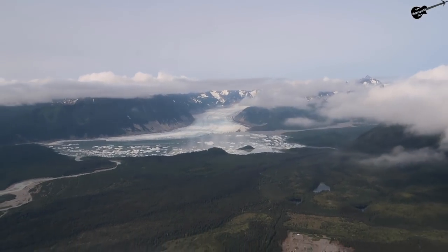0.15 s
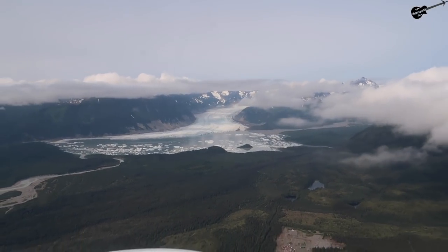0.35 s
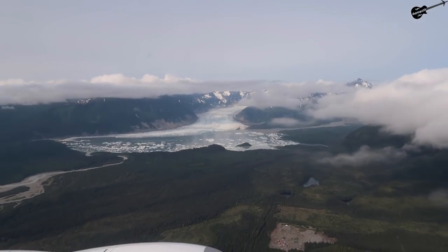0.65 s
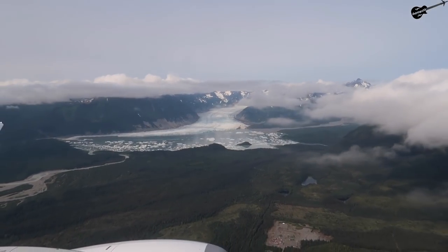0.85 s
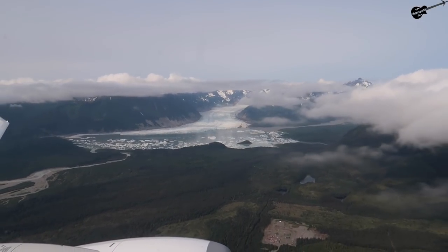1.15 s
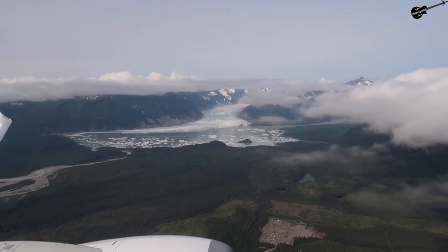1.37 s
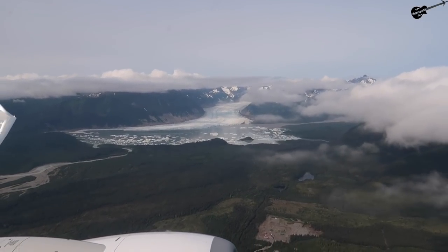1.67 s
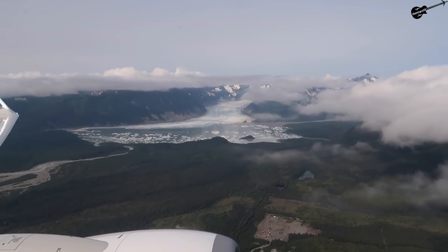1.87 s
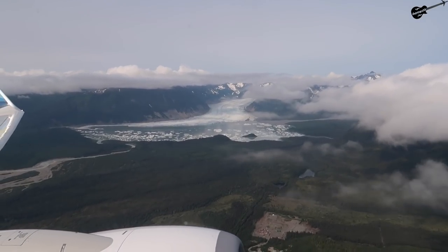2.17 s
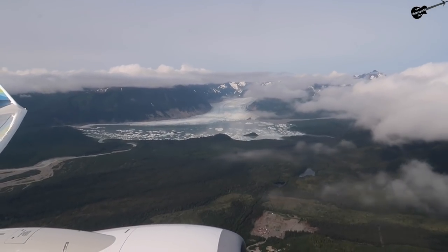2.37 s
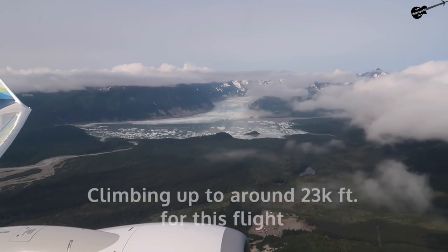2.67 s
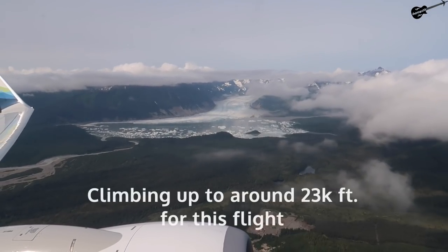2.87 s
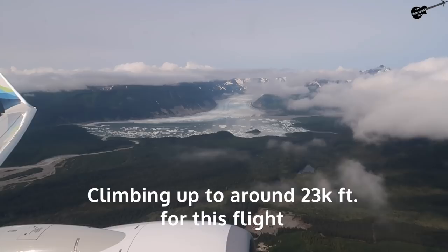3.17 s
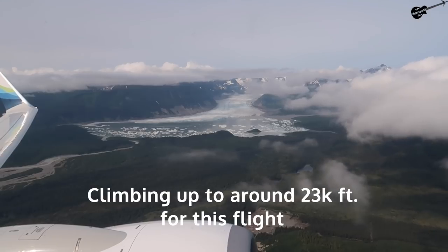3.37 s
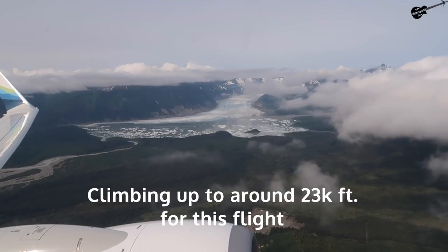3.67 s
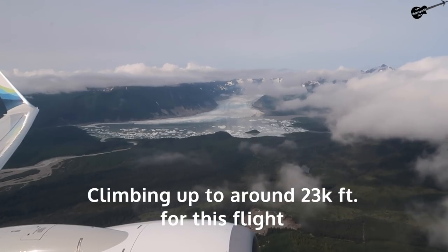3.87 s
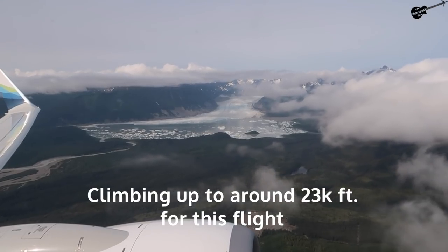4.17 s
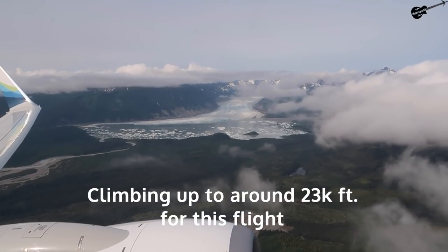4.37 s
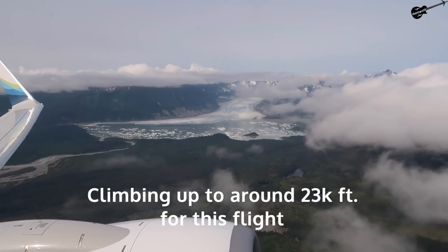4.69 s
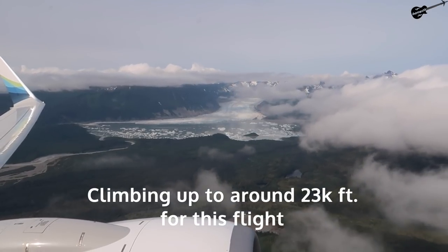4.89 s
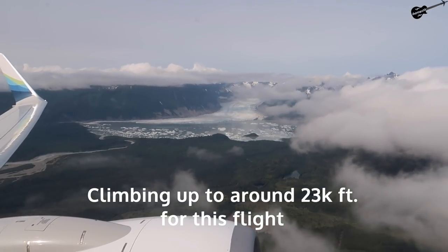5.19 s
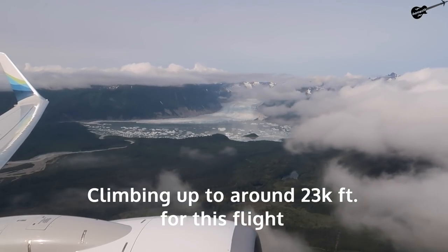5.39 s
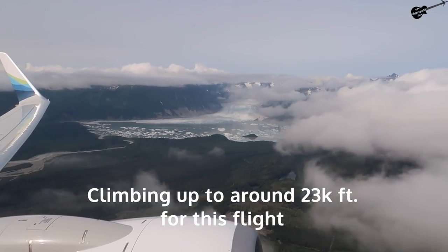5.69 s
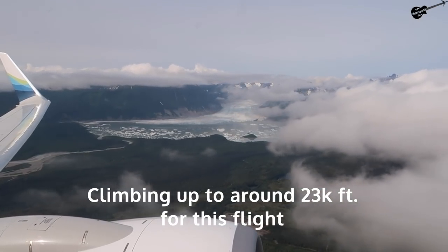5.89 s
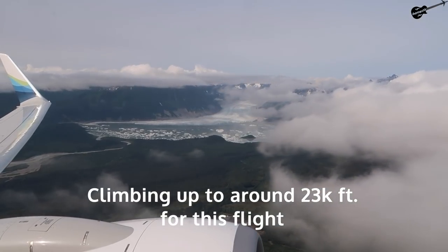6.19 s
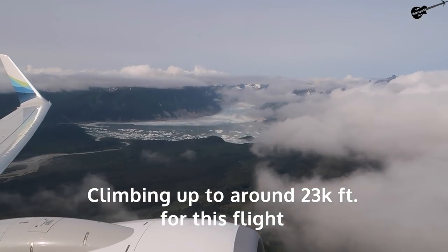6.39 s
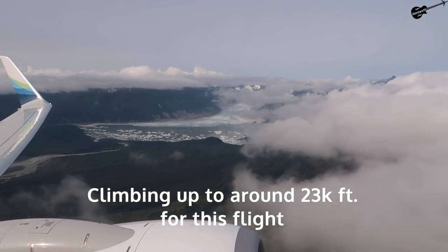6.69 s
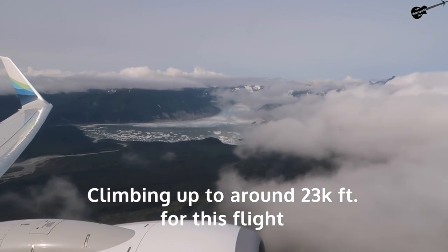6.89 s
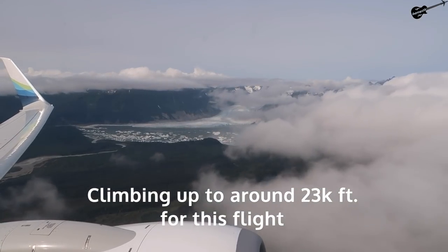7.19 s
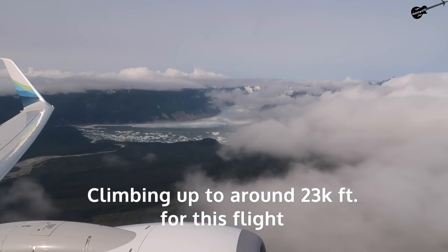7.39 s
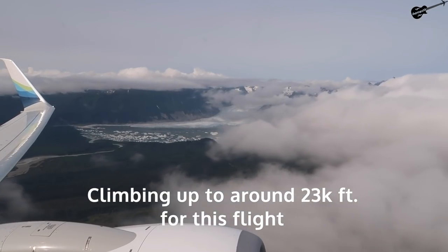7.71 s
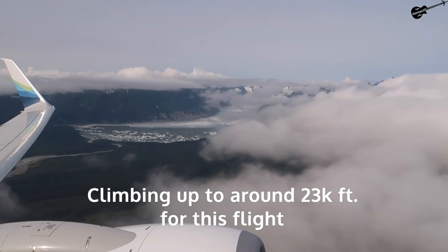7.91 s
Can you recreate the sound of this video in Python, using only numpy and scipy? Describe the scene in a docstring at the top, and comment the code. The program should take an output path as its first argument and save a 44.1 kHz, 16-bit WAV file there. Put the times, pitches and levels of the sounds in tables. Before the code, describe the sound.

Passenger-seat cabin sound over the wing: deep engine hum, buzz-saw rasp and wavering thin whines blend with a constant dull air roar.

```python
"""Jet climb from a wing seat

Two jet engines at climb power, heard through the cabin wall. Supersonic fan tips make a buzz-saw tone on
every multiple of the shaft speed; the fans turn at slightly different speeds, so their blade tones beat.
A once-per-turn hum, a core shaft tone and three thin whines are sines with wavering levels.
Jet roar, the rush of air along the skin and hiss are filtered noise that fills in below."""
import sys
import numpy as np
from scipy import signal
from scipy.fft import rfft, irfft, next_fast_len
from scipy.io import wavfile
from scipy.ndimage import uniform_filter1d, minimum_filter1d

SR = 44100
rng = np.random.default_rng(int(sys.argv[2]) if len(sys.argv) > 2 else 0)


def bounce(signal):
    """Save signal as a 16-bit WAV file at the path given by the first command-line argument."""
    frames = np.transpose(np.atleast_2d(signal))
    limited = np.clip(frames, -1, 1)
    pcm = np.round(limited * 32767).astype(np.int16)
    wavfile.write(sys.argv[1], SR, pcm)


N = 355005
TIME_S = np.arange(N) / SR


def from_db(db):
    """Decibels to gain."""
    return 10 ** (np.asarray(db) / 20)


def in_time(rows):
    """Curve columns, interpolated at every sample."""
    s, *columns = np.transpose(rows)
    return [np.interp(TIME_S, s, column) for column in columns]


def at_hz(points, hz):
    """Read a level curve on a log-frequency (or log-multiple) axis."""
    point_hz, point_db = np.array(points).T
    return np.interp(np.log(hz), np.log(point_hz), point_db)


def drift(rate_hz):
    """Slow chance: noise at every 100th sample through a double one-pole low-pass; spread 1."""
    pole = np.exp(-200 * np.pi * rate_hz / SR)
    noise = rng.standard_normal(N // 100 + 2002)
    slow = signal.lfilter([1], [1, -2 * pole, pole * pole], noise)[2000:]   # drop the filter's start-up
    return np.interp(np.arange(N) / 100, np.arange(len(slow)), slow / slow.std())


# mean speed of the two fan shafts, creeping up: (time [s], speed [turns/s])
SHAFT_SPEED = [(0, 77.742), (2.25, 77.795), (5.25, 77.94), (8.05, 78.012)]
# moments at which the fans' blade tones cancel, the far fan having gained one more blade: time [s]
BLADE_NULLS = [0.247, 0.643, 1.336, 2.066, 2.516, 2.891, 3.234, 3.695, 4.088, 4.451, 5.134, 5.615, 5.96,
               6.527, 7.0, 7.415, 7.762]
BLADES = 24


def fan_angles():
    """Shaft angles [turns] of the far and near fan: each null puts the far fan one more blade ahead."""
    mean = np.cumsum(in_time(SHAFT_SPEED)[0]) / SR
    nulls = np.r_[BLADE_NULLS[0] - .45, BLADE_NULLS, BLADE_NULLS[-1] + .4]
    # tones cancel half a blade apart, hence the .5
    blades_ahead = np.interp(TIME_S, nulls, np.arange(len(nulls)) - .5)
    blades_ahead = uniform_filter1d(blades_ahead, size=SR // 8)
    half_lead = blades_ahead / BLADES / 2
    return mean + half_lead, mean - half_lead


# buzz-saw tones that stand out, levels at mid-scene before swell and waver: (multiple of shaft speed,
# far fan level [dB], its growth [dB/s], near fan level [dB], its growth [dB/s])
BUZZ_TONES = [(2, -42, 0, -34, 0), (3, -44, 0, -30.5, 0), (4, -40, 0, -50, 0), (5, -66, 0, -35, 0),
              (6, -60, 0, -45, 0), (8, -69, 0, -46, .2), (11, -62, 0, -50.5, .9), (13, -58, 0, -62, 0),
              (14, -57.5, .3, -68, 0), (15, -60, 0, -64, 0), (16, -69, 0, -59.5, .8), (17, -64, 1, -64, 1),
              (18, -60, 0, -58, .3), (19, -68, 0, -65, -.6), (20, -74, 1, -70, .8), (21, -63, .4, -64, 1.5),
              (22, -66, 1.2, -67, .4), (24, -49.3, 0, -49.3, -.1), (25, -62, 0, -57.5, .9),
              (26, -68, -.3, -65, 0), (27, -59.5, 0, -67, 1), (28, -72, 1, -71, -1), (29, -61, 0, -66, 1.4),
              (30, -86, 0, -63, 0), (31, -73, .8, -69, -.3), (32, -68, 0, -70, -1),
              (33, -65, -1, -61.5, -.2), (34, -84, 0, -75, .9), (35, -79, .4, -75, .7),
              (36, -68, 0, -80, 1), (37, -80, 0, -67.5, -.6), (38, -74, -.6, -61.5, -.4),
              (39, -83, 0, -69.5, .3), (40, -74, .4, -76, -.4), (41, -72, .7, -70, -.9),
              (42, -77, 0, -73.5, -2.5), (43, -77, 0, -77, -.6), (44, -79, 0, -80, 0),
              (45, -84, 1, -71, .2), (46, -76, .5, -71.5, .9), (47, -78, 0, -71.5, .3),
              (48, -61, -.3, -70, .8), (49, -79, .5, -75, .8), (50, -74, -1.2, -86, 0),
              (51, -73.5, .6, -73.5, .5), (52, -84, 0, -72.5, 1), (53, -86, 1.5, -84, 1.8),
              (55, -83, .8, -86, .8), (56, -83, 0, -86, 0), (57, -76, .3, -84, .3), (58, -86, 0, -77.5, 0),
              (59, -90, .8, -88, .8), (62, -88, 0, -86, 0), (63, -89, 0, -84, 0), (64, -87, .6, -91, .6),
              (65, -86, 1.5, -86, 1.5), (70, -92, 0, -83, 0), (71, -83.5, -.4, -93, 0),
              (72, -87, .3, -89, .3), (74, -90, 0, -94, 0), (81, -93, 1.5, -86, 2), (83, -92, 0, -89, .5),
              (86, -92, 0, -89, .5), (116, -97, -.3, -99, -.3)]
# centre of the scattered levels of all other tones, blade unevenness being chance: (multiple, level [dB])
OTHER_BUZZ = [(7, -57), (13, -61), (23, -71), (35, -77), (44, -80), (53, -85), (60, -92), (72, -95),
              (85, -97), (124, -104)]
# tones in the side pick-up against the front one, before scatter: (multiple, level [dB])
SIDE_BUZZ = [(2, -53.5), (5, -44.5), (8, -36), (11, -22.5), (16, -22.5), (23, -18), (24, -14), (25, -14),
             (32, -12), (41, -17.5), (48, -25), (54, -4), (62, 0.5), (124, -3)]
# far-fan tones that sink mid-way and return: (multiple, level change [dB])
FAR_DIPS = [(29, -12), (48, -12)]
# a moment at which the two fans cancel on a tone that beats clearly: (multiple, time [s])
CLEAR_NULLS = [(21, 4.29), (25, 4.85), (27, 5.16), (29, 6.66), (33, 3.66), (38, 1.89), (48, 5.8),
               (51, 6.36)]
# the far fan's other tones run a little ahead of its blade tone at first: (time [s], lead [turns])
FAR_TONE_LEAD = [(0, .009), (2, .006), (4, 0), (8.05, 0)]
TOP_MULTIPLE = 124
REST_SCATTER_DB, SIDE_SCATTER_DB = 4, 2.5
SIDE_LAG_RAD, SIDE_LAG_SCATTER_RAD = 1.9, 1.1
BLADE_WAVER_DB, BLADE_FLUTTER_DB, FLUTTER_DB = .5, .5, 1.8


def buzz_saw(angle, lead, listed_db, growth_db_per_s, sags, null_turn, waver_db):
    """One fan: a shock pattern that repeats each turn; interleaved groups of tones waver on their own."""
    multiple = np.arange(2, TOP_MULTIPLE + 1)
    scatter = rng.standard_normal((2, len(multiple)))
    level_db = at_hz(OTHER_BUZZ, multiple) + REST_SCATTER_DB * scatter[0]
    listed = np.array(BUZZ_TONES)[:, 0].astype(int) - 2   # index 0 is multiple 2
    level_db[listed] = listed_db
    growth_db = np.zeros(len(multiple))
    growth_db[listed] = growth_db_per_s * N / SR / 2   # over half the scene
    early, middle, late = from_db(-growth_db), np.ones(len(multiple)), from_db(growth_db)
    for sagging, sag_db in sags:
        middle[sagging - 2] = from_db(sag_db)

    size = from_db(level_db) * np.sqrt(2)   # rms to peak
    side_size = size * from_db(at_hz(SIDE_BUZZ, multiple) + SIDE_SCATTER_DB * scatter[1])
    phase = 2 * np.pi * rng.random((2, len(multiple)))
    blade = multiple % BLADES == 0
    phase[0, blade | (multiple == 3)] = 0   # these tones set the beats that stand out
    for beating, null_s in CLEAR_NULLS:
        turns_at_null = (angle + lead)[int(null_s * SR)]
        phase[0, beating - 2] = 2 * np.pi * (null_turn - beating * turns_at_null)
    lag_scatter = SIDE_LAG_SCATTER_RAD * rng.standard_normal(len(multiple))
    phase[1] = phase[0] - SIDE_LAG_RAD + lag_scatter

    steady = blade | (multiple == 3) | (multiple == 5)
    groups = np.where(multiple == BLADES, 8, np.where(steady, 7, multiple % 7))
    turn = np.linspace(0, 1, 8193)
    blend = 2 * np.arange(N) / N - 1   # -1 at the start, 0 mid-way, 1 at the end
    out = np.zeros(N, complex)   # real part: front, imaginary part: side
    for group in range(9):
        pick = groups == group
        cycles = 2 * np.pi * np.outer(turn, multiple[pick])
        front_shape = np.cos(cycles + phase[0, pick]) * size[pick]
        side_shape = np.cos(cycles + phase[1, pick]) * side_size[pick]
        shape = front_shape + 1j * side_shape
        group_angle = (angle + lead * (group < 8)) % 1   # the blade tone takes no lead
        first, mid, last = [np.interp(group_angle, turn, shape @ gain[pick])
                            for gain in (early, middle, late)]
        slow_db, fast_db = waver_db, FLUTTER_DB
        if steady[pick].all():
            slow_db, fast_db = BLADE_WAVER_DB, BLADE_FLUTTER_DB
        waver = slow_db * drift(.7) + fast_db * drift(7)   # turbulence makes each group flutter
        end = np.where(blend < 0, first, last)
        out += from_db(waver) * (mid + np.abs(blend) * (end - mid))
    return np.array([out.real, out.imag])


# once-per-turn hum of the near fan, before its waver: (time [s], level [dB])
HUM_LEVEL = [(0, -28), (.75, -26), (1.1, -22), (1.7, -22.5), (2.3, -18), (2.75, -21), (3.25, -21.5),
             (3.7, -20), (4.25, -19), (4.6, -21.5), (5.4, -22.5), (5.8, -20), (6.3, -21), (6.9, -22.5),
             (7.4, -20.5), (7.75, -23), (8.05, -30)]
HUM_WAVER_DB = .7


def fan_hum(near):
    """Once-per-turn hum of the near fan through the airframe: a sine locked to its shaft angle."""
    level_db = in_time(HUM_LEVEL)[0] + HUM_WAVER_DB * drift(1.5)
    hum = np.sqrt(2) * from_db(level_db) * np.sin(2 * np.pi * near)
    return hum * from_db([[0], [-80]])   # front, side


CORE_HZ, CORE_NULL_S = 232.24, 3.68   # pitch, and a moment of cancelling the near fan's third tone
CORE_DB, CORE_WAVER_DB = -28.5, 1.3


def core(near):
    """The core shaft tone lies just under the near fan's third tone and throbs against it."""
    third_tone_turns = 3 * near[int(CORE_NULL_S * SR)]
    turns = CORE_HZ * (TIME_S - CORE_NULL_S) + third_tone_turns + .5   # half a turn apart cancels
    level = from_db(CORE_DB + CORE_WAVER_DB * drift(1.2))
    return np.sqrt(2) * level * np.cos(2 * np.pi * turns) * from_db([[0], [-42]])   # front, side


# three close whines, two perhaps pumps and one near the fans' 19th multiple, that beat into short surges:
# (pitch [Hz], start of cycle [turns])
WHINE_PITCHES = [(1472.97, -.3), (1476.72, .5), (1479.86, 0)]
# their levels before flutter: (time [s], first level [dB], second level [dB], third level [dB])
WHINE_LEVELS = [(0, -49, -49, -57), (.3, -52, -56, -62), (.75, -53, -61, -62), (1.5, -53, -61, -63),
                (2.25, -51, -49, -56), (2.6, -55, -55, -65), (3.0, -54, -57, -62), (3.4, -50, -51, -56),
                (3.9, -50, -54, -62), (4.4, -49, -50.5, -52), (4.8, -54, -55, -62), (5.2, -50, -53, -60),
                (5.65, -47, -50, -66), (6.0, -50, -54, -58), (6.5, -50, -59, -58), (7.0, -48, -54, -49),
                (7.4, -49, -51, -58), (8.05, -52, -54, -66)]
WHINE_WANDER_HZ, WHINE_FLUTTER_DB = .02, 1.5


def whines():
    """Thin sine tones around fixed pitches, wandering a little and fluttering in level."""
    out = 0
    for (hz, start), level_db in zip(WHINE_PITCHES, in_time(WHINE_LEVELS)):
        pitch_hz = hz + WHINE_WANDER_HZ * drift(0.6)
        phase = 2 * np.pi * (start + np.cumsum(pitch_hz) / SR)
        level = from_db(level_db + WHINE_FLUTTER_DB * drift(9.3))
        out = out + np.sqrt(2) * level * np.sin(phase)
    return out * from_db([[0], [-22]])   # front, side


# swell of the air rush, before trim and patchiness: (time [s], level [dB])
AIR_RUSH = [(0, -31), (1, -31), (1.35, -34.5), (1.7, -31.5), (2.3, -32), (3, -30.5), (3.6, -31),
            (4.2, -28.5), (4.8, -32), (5.8, -29), (6.7, -31.5), (7.1, -28), (7.6, -32), (8.05, -32.5)]
# noise colour in the front-facing pick-up: (frequency [Hz], relative density [dB])
FRONT_COLOUR = [(20, -22.5), (30, -25), (45, -7), (62, -4), (130, 1.5), (165, -3.5), (225, -4.5),
                (370, -15.5), (750, -27), (1250, -36.5), (2050, -42.5), (2450, -48), (2800, -52.5),
                (3350, -52.5), (3650, -51.5), (3900, -54.5), (4500, -62.5), (5200, -66.5), (5600, -64),
                (6200, -70), (9500, -74.5), (10300, -80.5), (11600, -79.5), (11900, -105)]
# noise colour in the side-facing pick-up: (frequency [Hz], relative density [dB])
SIDE_COLOUR = [(20, -95), (60, -78), (100, -60), (150, -51), (180, -48), (230, -44), (280, -47), (370, -50),
               (520, -45.5), (700, -51), (800, -48.5), (900, -53), (1250, -60), (2050, -46.5), (3300, -68),
               (4100, -61.5), (8000, -70), (12300, -71), (13200, -83.5), (14300, -92)]
# narrow and broad cabin resonances that colour the noise: (centre [Hz], width [Hz], boost [dB])
CABIN_RESONANCES = [(154, 9.9, 3), (346, 74, 3), (621, 84, 4), (1038, 120, 5), (1490, 31, 4.5)]
ROAR_TOP_HZ, RUSH_TOP_HZ = 400, 2500
ROAR_FOLLOWS, HISS_FOLLOWS = 0.72, 0.96   # share of the rush's swing in dB
HISS_GROWTH_DB_PER_S = 0.05


def cabin_noise(patchy_db):
    """Front and side noise, split into roar, rush and hiss, each under its own level."""
    rush_db, = in_time(AIR_RUSH)
    swing_db = rush_db - rush_db.mean()
    # roar and hiss levels relative to the rush, which scales all three at the end
    roar_db = (ROAR_FOLLOWS - 1) * swing_db
    hiss_growth_db = HISS_GROWTH_DB_PER_S * (np.arange(N) - N / 2) / SR
    hiss_db = (HISS_FOLLOWS - 1) * swing_db + hiss_growth_db

    size = next_fast_len(N)
    hz = np.maximum(np.arange(size // 2 + 1) * SR / size, 1)
    cabin_db = sum(db * np.exp(-((hz - peak_hz) / width) ** 2)
                   for peak_hz, width, db in CABIN_RESONANCES)
    colour_db = np.array([at_hz(FRONT_COLOUR, hz), at_hz(SIDE_COLOUR, hz)]) + cabin_db
    shaped = rfft(rng.standard_normal((2, size))) * from_db(colour_db)
    low = 1 / (1 + (hz / ROAR_TOP_HZ) ** 4)
    high = 1 / (1 + (RUSH_TOP_HZ / hz) ** 4)
    roar, rush, hiss = [irfft(shaped * share, size)[:, :N] for share in (low, 1 - low - high, high)]

    layers = roar * from_db(roar_db)
    layers = layers + rush * from_db(patchy_db * drift(5.0))
    layers = layers + hiss * from_db(hiss_db + 1.2 * patchy_db * drift(14.0))
    return layers * from_db(rush_db - 1.0) / rush[0].std()


def scene():
    """Front and side pick-ups, matrixed to left and right; the fan tones swell with the air rush."""
    far, near = fan_angles()
    _, far_db, far_growth, near_db, near_growth = np.transpose(BUZZ_TONES)
    far_lead = in_time(FAR_TONE_LEAD)[0]
    far_fan = buzz_saw(far, far_lead, far_db, far_growth, FAR_DIPS, null_turn=.5, waver_db=1.5)
    near_fan = buzz_saw(near, 0, near_db, near_growth, [], null_turn=0, waver_db=1.2)
    rush_db = in_time(AIR_RUSH)[0]
    fan_swell_db = 0.82 * (rush_db - rush_db.mean()) + 0.5
    fans = (far_fan + near_fan) * from_db(fan_swell_db)
    front, side = fans + fan_hum(near) + core(near) + whines() + cabin_noise(patchy_db=1.36)
    return np.array([front + side, front - side])


LIMIT, MAKE_UP_DB = .72, .6   # limiter ceiling (full scale 1), gain before it
CUTOFF_HZ, FADE_IN_S = 14600, .004


def record(dry):
    """A fast gain control presses the loudest swells down, a limiter holds the peaks, the top is cut."""
    loud = uniform_filter1d(np.mean(dry ** 2, axis=0), size=SR // 40)
    over_db = np.maximum(10 * np.log10(loud + 1e-12) + 14.5, 0)   # excess above -14.5 dB
    pressed = dry * uniform_filter1d(from_db(MAKE_UP_DB - .25 * over_db), size=SR // 40)
    room_left = np.minimum(1, LIMIT / (np.abs(pressed).max(axis=0) + 1e-9))
    held = minimum_filter1d(room_left, size=SR // 50)
    smooth_gain = uniform_filter1d(uniform_filter1d(held, size=SR // 100), size=SR // 100)
    limited = pressed * smooth_gain
    limited = limited * np.minimum(TIME_S / FADE_IN_S, 1)
    cut = signal.cheby2(18, 70, CUTOFF_HZ, fs=SR, output="sos")
    return signal.sosfilt(cut, limited)


dry = scene()
out = record(dry)
bounce(out)
```